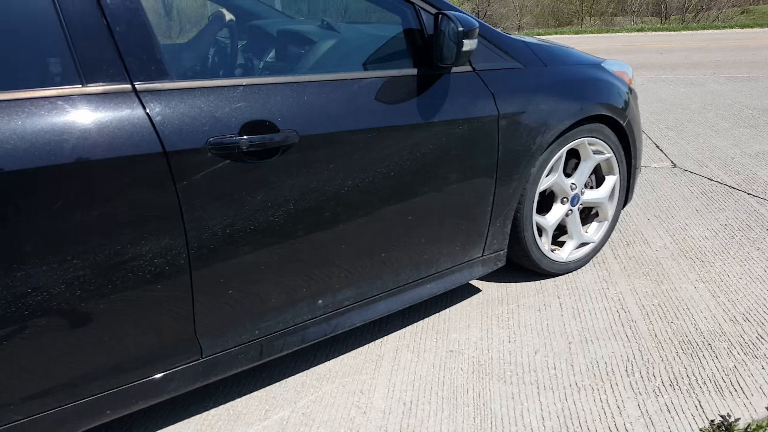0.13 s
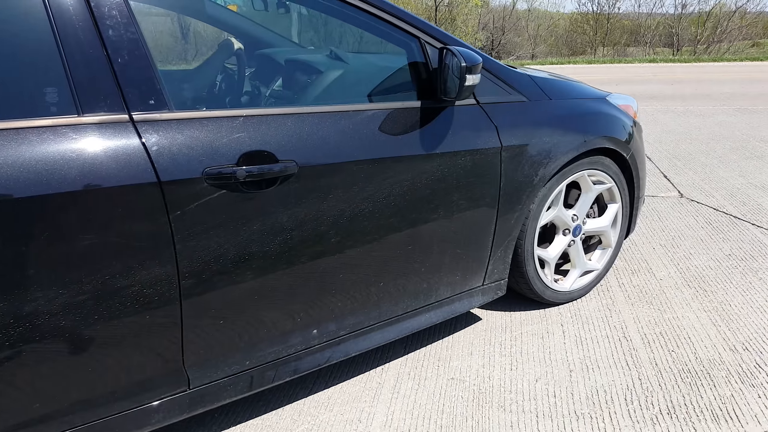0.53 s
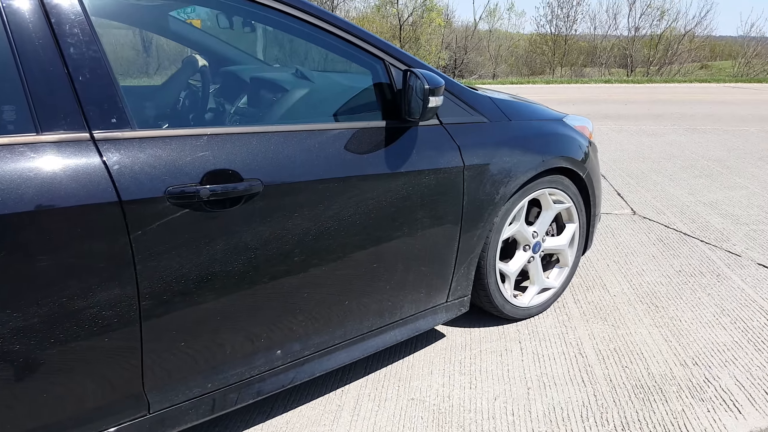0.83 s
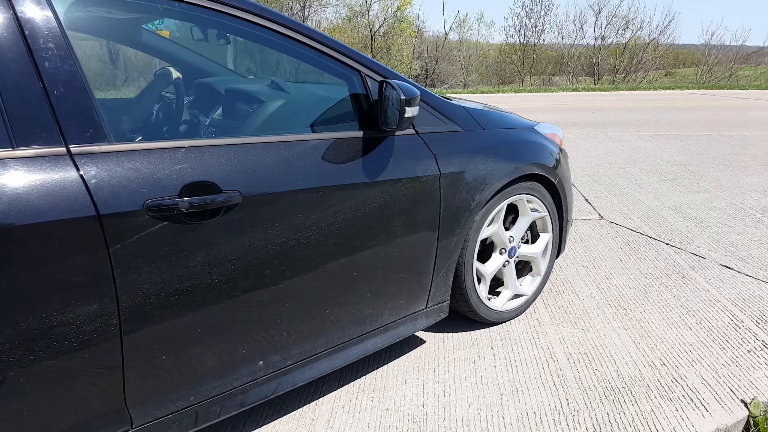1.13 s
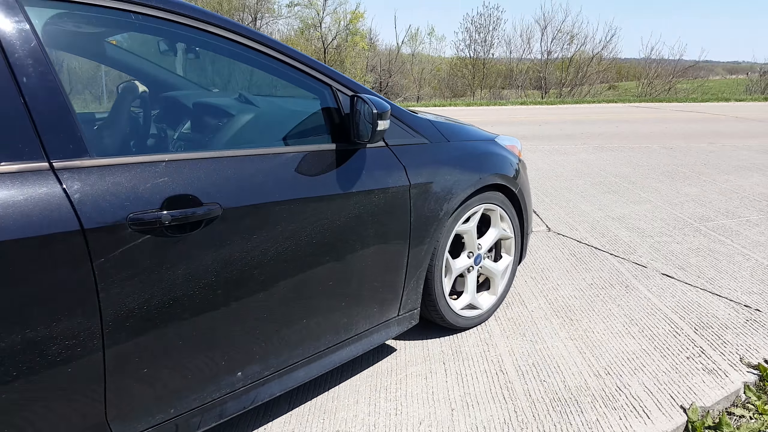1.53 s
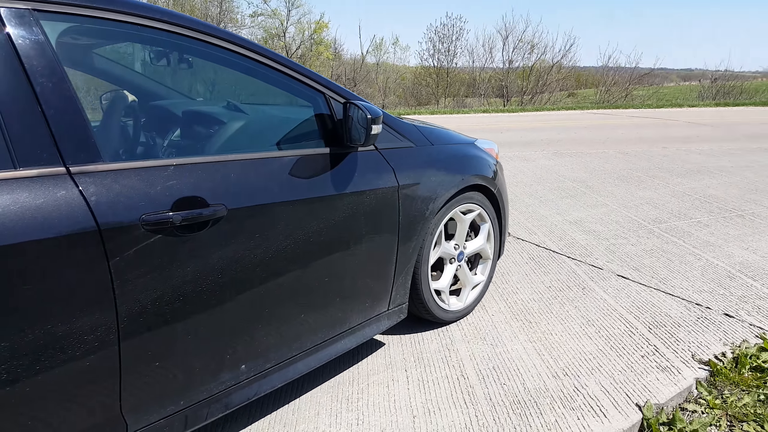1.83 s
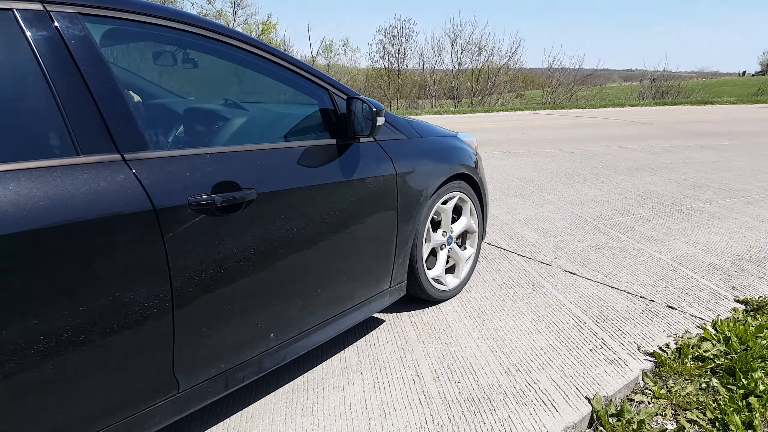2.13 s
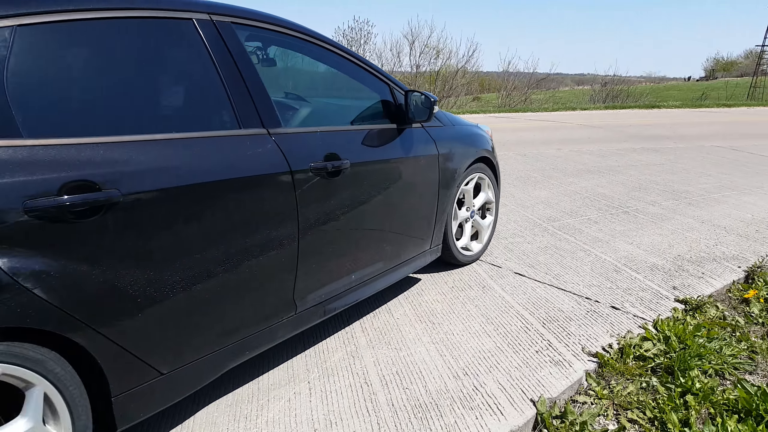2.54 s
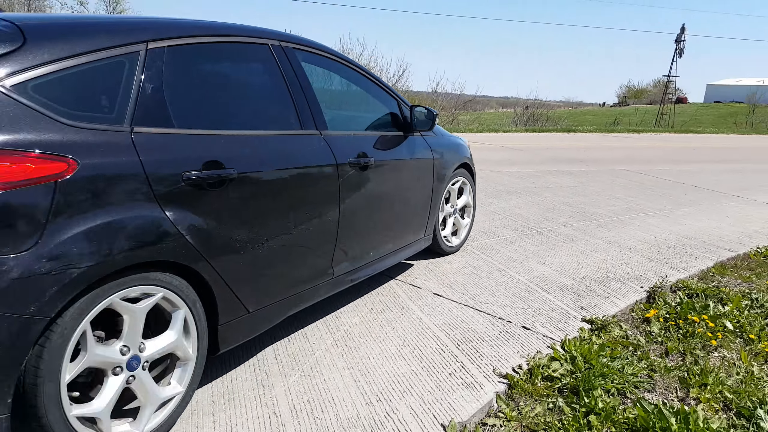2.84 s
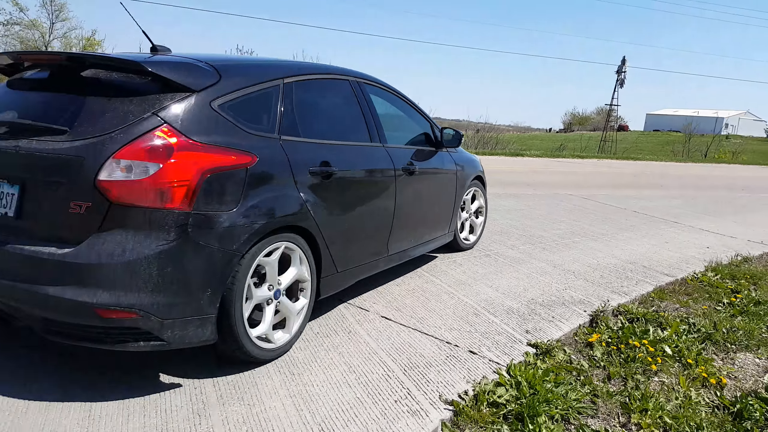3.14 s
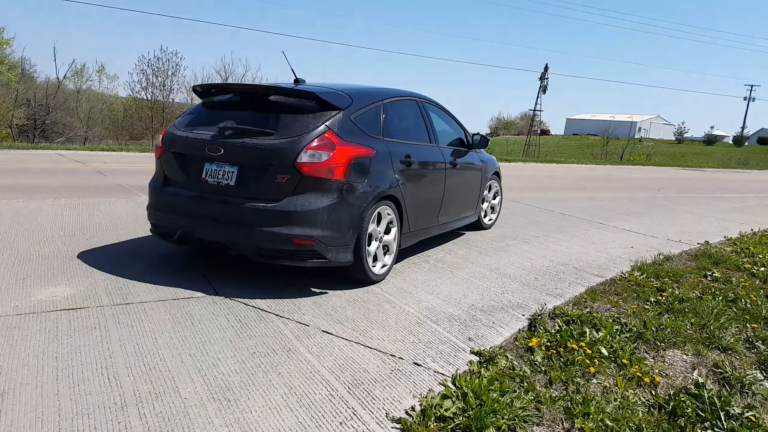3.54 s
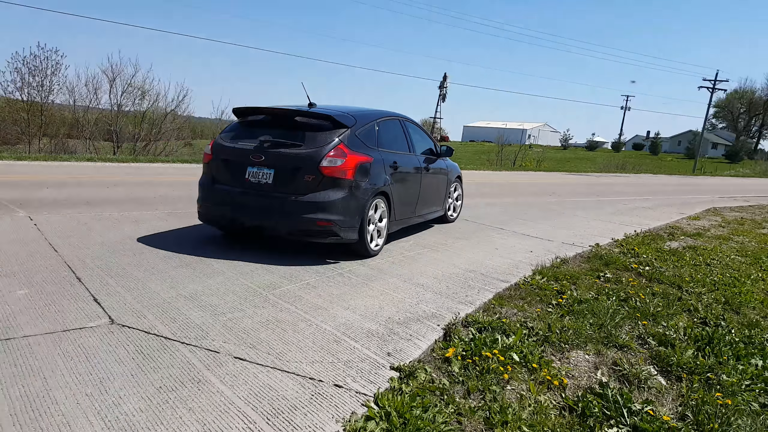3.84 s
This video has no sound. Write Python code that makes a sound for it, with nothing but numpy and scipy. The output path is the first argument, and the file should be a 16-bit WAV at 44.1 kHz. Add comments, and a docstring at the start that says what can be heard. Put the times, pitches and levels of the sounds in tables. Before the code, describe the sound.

A small turbocharged car passes very close outdoors on concrete. A falling rev and bright whistling air rush come first, then a deep lugging exhaust boom, tyre hiss and grit snaps, ending raspier as revs rise.

```python
"""A falling rev, a rush of intake air, then a lugging engine whose exhaust booms and turns raspy: a turbocharged
four-cylinder hatchback pulls away on concrete, an arm's length from the microphone, its tyres snapping grit.
Exhaust pulses ring the pipes over a three-tone boom and a gas rumble; the dumped air is shaped noise
with duct and valve whistles. Coloured noise makes whirr, tyre hiss and engine bay; short noise bursts are the grit."""
import sys
import numpy as np
from scipy import signal
from scipy.fft import rfft, irfft
from scipy.io import wavfile
from scipy.ndimage import uniform_filter1d

SR = 44100
rng = np.random.default_rng(int(sys.argv[2]) if len(sys.argv) > 2 else 0)


def transcribe(signal):
    """Save signal, clipped to [-1, 1], as a 16-bit WAV file at the path in sys.argv[1]."""
    frames = np.atleast_2d(signal).T
    limited = np.clip(frames, -1, 1)
    pcm = np.round(limited * 32767).astype(np.int16)
    wavfile.write(sys.argv[1], SR, pcm)


N = 176400

START_S, FADE_S = 0.404, 0.025  # the sound comes in out of silence
TOP_HZ = 15700  # upper limit of the microphone

# Engine speed. Each row: time in seconds, firings per second.
ENGINE_SPEED = [(.4, 103.5), (.5, 99), (.6, 96.5), (.7, 93.4), (.9, 83.3), (1.2, 73.2), (1.4, 66.2),
                (1.66, 55.4), (1.8, 54.9), (2.0, 60.7), (2.1, 60.8), (2.29, 57.4), (2.45, 52), (2.62, 51),
                (2.82, 55), (3.03, 55.6), (3.29, 52.8), (3.48, 63.8), (3.62, 66.6), (3.8, 74), (4, 81)]

# Stereo tilt at the microphone. Each row: frequency in Hz, left minus right in dB.
STEREO_LEAN = [(60, 0.6), (300, 0), (800, 0.6), (1250, 2.5), (1900, 8), (2400, 5.5), (3300, 2),
               (4400, -0.5), (6000, 4.5), (7000, 6), (8700, -0.5), (11500, 0.5), (13600, 6), (15500, -2)]
# Likeness of the noise on the two sides. Each row: frequency in Hz, correlation from 0 to 1.
STEREO_LIKENESS = [(60, .965), (125, .94), (250, .7), (600, .6), (1000, .6), (2000, .45), (4000, .3),
                   (8000, .15)]
AIR_LAG_S, CAR_LAG_S = 0.00018, -0.000048  # how much later the left side hears the intake and the rest of the car

# Engine bay and rolling tyres. Each row: time in seconds, whirr level in dB, treble hiss level in dB.
ROLL_LEVELS = [(.42, -42, -52), (1.2, -43.5, -40), (1.85, -29.5, -38), (2.25, -28.5, -38),
               (2.6, -29.5, -40), (3.05, -30, -42), (3.3, -31, -44), (3.6, -28, -44.5), (4, -28.5, -47)]
# Tone of the whirr. Each row: frequency in Hz, gain in dB.
WHIRR_TONE = [(400, 2), (700, -1.5), (1030, -3.5), (1300, -5), (1580, -3), (1900, -0.5), (2150, -7),
              (2550, -8), (3100, -15), (3800, -15.5), (4800, -19), (8000, -26)]
# Tone of the tyre hiss. Each row: frequency in Hz, gain in dB.
HISS_TONE = [(2500, 5), (4000, -3.5), (5200, -5), (5950, 3), (6500, -2.5), (7100, 2), (8300, -3.5),
             (9500, -1), (10200, 0.5), (10900, -5), (12500, -6), (13500, -4), (14400, -19), (15700, -40)]
# Dulling of the top of the hiss as the car turns away. Each row: time in seconds, gain above DULL_HZ in dB.
HISS_DULLING = [(2.3, 0), (3.1, -2), (4, -4.5)]
DULL_HZ = 8000
# Resonances of the engine bay. Each row: frequency in Hz, width in Hz, gain in dB.
BAY_MODES = [(1685, 46, 3.5), (1764, 44, 5), (1970, 70, -7), (5950, 160, -12), (13200, 560, -14.5)]
# Engine bay, heard while the bonnet is near. Each row: time in seconds, level in dB.
BAY_LEVEL = [(.42, -65), (1.3, -33), (1.75, -31.5), (2.3, -36), (2.6, -50), (4, -53)]
ROLL_THROB = 0.11  # depth of the swell at each firing

# Loud grit snaps under the tyres. Each row: time in seconds, level in dB, left minus right in dB.
GRIT_SNAPS = [(2.896, -29, 3.5), (3.102, -29.5, .5), (3.133, -30, 2), (3.181, -28, 3), (3.301, -34, 2.5),
              (3.539, -28.5, 1.5), (3.747, -39, 3), (3.926, -34, 2)]
# Tone of the grit. Each row: frequency in Hz, gain in dB.
GRIT_TONE = [(800, -10), (2000, -3), (4800, 1), (9000, -4), (14000, -3), (16000, -8)]
GRIT_DECAY_S, FINE_GRIT_DB = 0.0018, -45  # fine snaps lie 0 to 6 dB above this level
GRIT_FROM_S, GRIT_SPAN_S = 2.6, 1.4  # stretch of time holding the fine snaps

# Rushing intake air, shut off by a valve. Each row: time in seconds, body level in dB, treble level in dB.
AIR_LEVELS = [(.41, -71, -78), (.47, -32, -30.5), (.55, -25.5, -23), (.72, -21, -21), (.95, -21.5, -27),
              (1.2, -23.5, -33), (1.44, -24, -37.5), (1.54, -28, -41), (1.8, -32, -69), (1.85, -62, -67),
              (2.0, -80, -74)]
# Tone of the air jet. Each row: frequency in Hz, gain in dB.
AIR_TONE = [(410, -45), (700, -3), (839, -5), (1060, -9.5), (1410, -0.5), (2000, -1), (2280, 2.5),
            (2460, 0.5), (3490, -1), (4640, -7), (5080, -6.5), (7120, -15), (7600, -15.5), (14000, -20.5),
            (15500, -28.5)]
# Whistling resonances of the ducts. Each row: frequency in Hz, width in Hz, gain in dB.
DUCT_MODES = [(1462, 30, -3), (1790, 70, -6), (2330, 45, 0), (2585, 30, -6), (2776, 20, -6), (2940, 25, -6),
              (3395, 15, -3), (3517, 35, -2), (4149, 24, -4), (4450, 24, -6)]
# Whistles of the valve. Each row: frequency in Hz, width in Hz, gain in dB.
VALVE_WHISTLES = [(5170, 18, 0), (6180, 40, -9), (7050, 200, -13)]
AIR_SPLIT_HZ, AIR_THROB = 6780, 0.083  # border of body and treble; depth of the swell at each firing
DUCT_DB, WHISTLE_DB = -4, -6.5  # ducts against the jet's body; whistles against the mean of body and treble

# Three lowest exhaust tones. Each row: time in seconds, firing tone in dB, its octave in dB, its twelfth in dB.
BOOM_LEVELS = [(.42, -29, -40, -42), (.6, -27, -43, -47), (.75, -20.5, -42, -44), (.91, -15, -41, -42),
               (.99, -19.5, -41, -36), (1.38, -22.5, -36, -38), (1.5, -29, -36, -42),
               (1.75, -24.5, -26.5, -31.5), (2.0, -18.3, -23, -32), (2.25, -17.7, -21.5, -29),
               (2.52, -15.7, -16.5, -28), (2.78, -13.5, -15, -24), (3.0, -12.8, -16.3, -22),
               (3.3, -12.7, -15.3, -21), (3.47, -15, -22, -21), (3.75, -15, -21, -24),
               (4, -15.3, -16, -24.5)]
# Exhaust pulses. Each row: time in seconds, putter level in dB, growl level in dB, rasp level in dB.
PIPE_LEVELS = [(.42, -42, -50, -58), (1.0, -45, -52, -52), (1.55, -43, -50, -56), (1.8, -35, -39, -54),
               (1.97, -30, -29, -54), (2.3, -27.5, -30.5, -52), (2.6, -24, -39, -50), (3.0, -21, -40, -46),
               (3.3, -21.5, -38, -45), (3.57, -21.5, -32, -37), (3.65, -23.5, -31, -27.5),
               (4, -23, -29, -24)]
# Resonances of the silencer. Each row: frequency in Hz, width in Hz, gain in dB.
SILENCER_MODES = [(210, 50, 3), (262, 60, 1.5), (330, 60, -2), (405, 70, -9)]
# Resonances of the growl. Each row: frequency in Hz, width in Hz, gain in dB.
GROWL_MODES = [(500, 70, -10), (590, 60, 0)]
# Resonances of the tailpipe. Each row: frequency in Hz, width in Hz, gain in dB.
TAILPIPE_MODES = [(658, 110, 7.5), (797, 43, 3.5), (1000, 49, -12)]
# Unevenness of the four cylinders, in firing turn. Each entry: pulse level in dB.
CYLINDER_LEVELS = [0.95, -1, 0.59, -0.53]
# Turbulent gas rumble. Each row: time in seconds, level in dB.
RUMBLE_LEVEL = [(.42, -48), (.58, -30), (1.0, -30), (1.5, -33), (2.0, -31.5), (2.6, -28), (3.2, -27.5),
                (4, -28)]
# Tone of the gas rumble. Each row: frequency in Hz, gain in dB.
RUMBLE_TONE = [(20, 0), (40, -4), (62, -2), (130, -3), (180, 0), (220, 4), (270, -3), (330, -8), (450, -16),
               (580, -15), (850, -15), (1100, -22), (2500, -45)]
PUTTER_TOP_HZ, GROWL_TOP_HZ, RASP_TOP_HZ = 560, 720, 1120  # upper edges of the pipes' pass bands
PUTTER_SCATTER_DB, RASP_SCATTER_DB, JITTER_S = 0.9, 1.3, 0.0001  # random spread of the pulses
RASP_GAS, RASP_LOPE = 1.0, 0.27  # gas puffs against bare pulses; every other firing rasps harder
PUFF_DECAY_S, RUMBLE_THROB = 0.0043, 0.29


def undb(db):
    """Decibels to gain."""
    return 10 ** (np.asarray(db) / 20)


def unit(x):
    """Scale to rms 1."""
    return x / np.sqrt(np.mean(x ** 2))


def curve(table, axis=1):
    """One column of a table, joined by straight lines in time."""
    rows = np.array(table, float)
    return np.interp(np.arange(N) / SR, rows[:, 0], rows[:, axis])


def bins():
    """Frequencies of the spectrum in Hz, kept off zero."""
    return np.maximum(np.arange(N // 2 + 1) * SR / N, 1)


def across(points):
    """Points joined on a log-frequency axis."""
    rows = np.array(points, float)
    return np.interp(np.log(bins()), np.log(rows[:, 0]), rows[:, 1])


def colour(x, points):
    """Shape the tone by a drawn frequency curve."""
    return irfft(rfft(x) * undb(across(points)), N)


def ring(x, modes):
    """Drive a set of damped resonances side by side."""
    f = bins()
    response = sum(undb(db) / (1 + 1j * (f * f - hz * hz) / (f * width)) for hz, width, db in modes)
    return irfft(rfft(x) * response, N)


def cut(x, hz, kind, order=4):
    """High-pass or low-pass."""
    return signal.sosfilt(signal.butter(order, hz, kind, fs=SR, output="sos"), x)


def walk(rate):
    """Smooth random drift of rms 1, with a new target `rate` times a second."""
    k = int(SR / rate)
    steps = np.repeat(rng.standard_normal(N // k + 1), k)
    smooth = uniform_filter1d(uniform_filter1d(steps, k), k)
    return unit(smooth[:N])


def noise():
    """Stereo noise, most alike on both sides in the bass."""
    like = np.clip(across(STEREO_LIKENESS), -1, 1)
    mid, side = rfft(rng.standard_normal((2, N)))
    mid, side = mid * np.sqrt(1 + like), side * np.sqrt(1 - like)
    return unit(irfft(np.array([mid + side, mid - side]), N))


def throb(turn, depth):
    """A gain that swells once with each firing."""
    return 1 + depth * np.cos(2 * np.pi * turn)


def rolling(turn):
    """Engine-bay whirr and resonances with tyre hiss: shaped noise throbbing faintly with the firings."""
    whirr = unit(colour(noise(), WHIRR_TONE)) * undb(curve(ROLL_LEVELS) + 1.0 * walk(24.96))
    hiss = unit(colour(noise(), HISS_TONE)) * undb(curve(ROLL_LEVELS, axis=2) + 1.0 * walk(25.03))
    hiss_top = irfft(rfft(hiss) * (bins() > DULL_HZ), N)
    dulled_hiss = hiss - hiss_top * (1 - undb(curve(HISS_DULLING)))
    bay = unit(ring(noise(), BAY_MODES)) * undb(curve(BAY_LEVEL))
    return (whirr + dulled_hiss + bay) * throb(turn, ROLL_THROB)


def grit():
    """Grit snaps as the rear tyre comes by: noise bursts that start at once and die exponentially."""
    t, env = np.arange(N) / SR, np.zeros((2, N))
    chance = rng.random(size=(24, 2))
    fine = [(GRIT_FROM_S + GRIT_SPAN_S * a, FINE_GRIT_DB + 6 * b, 2) for a, b in chance]
    for when, db, pan_db in list(GRIT_SNAPS) + fine:
        decay = (t >= when) * np.exp(-np.clip((t - when) / GRIT_DECAY_S, 0, 20))
        env += undb([[db + pan_db / 2], [db - pan_db / 2]]) * decay
    return env * unit(colour(noise(), GRIT_TONE))


def intake(turn):
    """Air dumped by the turbo hisses through ringing ducts and dulls as the pressure drops."""
    jet = colour(noise(), AIR_TONE)
    jet_body = unit(cut(cut(jet, AIR_SPLIT_HZ, "low"), 710, "high"))
    body = jet_body + undb(DUCT_DB) * unit(ring(noise(), DUCT_MODES))
    treble = unit(cut(jet, AIR_SPLIT_HZ, "high"))
    body_db, treble_db = curve(AIR_LEVELS), curve(AIR_LEVELS, axis=2)
    # the valve whistles loudest while the pressure is high
    whistle = undb(WHISTLE_DB + (body_db + treble_db) / 2) * unit(ring(noise(), VALVE_WHISTLES))
    flutter = throb(turn, AIR_THROB) * undb(0.5 * walk(29.97))
    return flutter * (body * undb(body_db) + treble * undb(treble_db) + whistle)


def firings(turn, scatter_db):
    """One uneven pulse for each firing, the cylinders in turn."""
    at = np.flatnonzero(np.diff(np.floor(turn)))
    chance = rng.standard_normal((len(at), 2))
    shift = np.round(JITTER_S * SR * chance[:, 0]).astype(int)
    out = np.zeros(N)
    where = np.clip(at + shift, 0, N - 1)
    out[where] = undb(np.resize(CYLINDER_LEVELS, len(at)) + scatter_db * chance[:, 1])
    return out


def exhaust_boom(turn):
    """The firing tone, its octave and its twelfth, each wavering slightly in level."""
    boom = np.zeros(N)
    for k in (1, 2, 3):
        level = undb(curve(BOOM_LEVELS, axis=k) + 0.66 * walk(27))
        boom += np.sqrt(2) * level * np.cos(2 * np.pi * k * turn)
    return boom


def exhaust_rasp(turn):
    """Loping pulses, each with a dying puff of gas noise, ring the tailpipe."""
    pulses = firings(turn, RASP_SCATTER_DB) * (1 + RASP_LOPE * np.cos(np.pi * turn))
    puff = signal.lfilter([1], [1, -np.exp(-1 / (PUFF_DECAY_S * SR))], pulses) * noise()
    tailpipe = ring(unit(pulses) + RASP_GAS * unit(puff), TAILPIPE_MODES)
    return unit(cut(cut(tailpipe, 520, "high", order=2), RASP_TOP_HZ, "low", order=8))


def exhaust(turn):
    """Boom, pulses ringing silencer and tailpipe, a growl ringing near 590 Hz, and gas rumble that throbs with
    the firings."""
    boom = exhaust_boom(turn)
    pulses = firings(turn, PUTTER_SCATTER_DB)
    putter = unit(cut(cut(ring(pulses, SILENCER_MODES), 175, "high"), PUTTER_TOP_HZ, "low"))
    growl = unit(cut(cut(ring(pulses, GROWL_MODES), 320, "high", order=2), GROWL_TOP_HZ, "low"))
    rasp = exhaust_rasp(turn)
    rumble = unit(colour(noise(), RUMBLE_TONE)) * throb(turn, RUMBLE_THROB)
    pipes = sum(part * undb(curve(PIPE_LEVELS, axis=k)) for k, part in enumerate([putter, growl, rasp], 1))
    return boom + pipes + rumble * undb(curve(RUMBLE_LEVEL))


def ports(x, lag_s):
    """Level difference and delay between the two microphone ports."""
    half = np.array([[1], [-1]]) / 2
    sides = undb(half * across(STEREO_LEAN))
    even_power = sides / np.sqrt(np.mean(sides ** 2, axis=0))
    delay = np.exp(-2j * np.pi * half * bins() * lag_s)
    return irfft(rfft(x) * delay * even_power, N)


def scene():
    """Engine, air and rolling noise follow the one crankshaft; grit falls freely; the car lies to the left."""
    turn = np.cumsum(curve(ENGINE_SPEED) * (1 + 0.0013 * walk(14))) / SR  # firings so far
    car = ports(rolling(turn) + exhaust(turn), CAR_LAG_S)
    air = ports(intake(turn), AIR_LAG_S)
    return car + air + grit()


def record(dry):
    """A quick fade-in, the microphone's bass cut and a steep cut of the top."""
    fade = np.clip((np.arange(N) / SR - START_S) / FADE_S, 0, 1)
    bass_cut = cut(dry * fade, 38, "high")
    return signal.sosfilt(signal.ellip(10, 0.2, 80, TOP_HZ, fs=SR, output="sos"), bass_cut)


dry = scene()
out = record(dry)
transcribe(out)
```